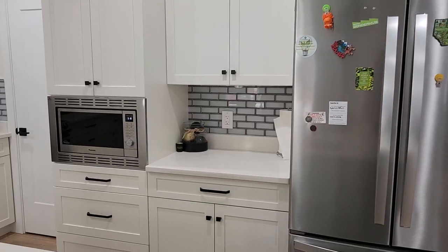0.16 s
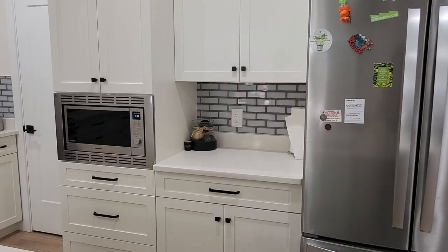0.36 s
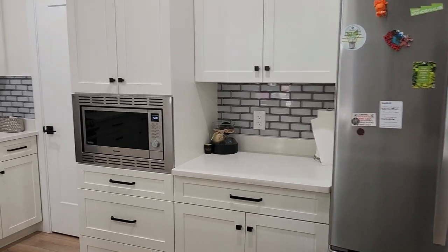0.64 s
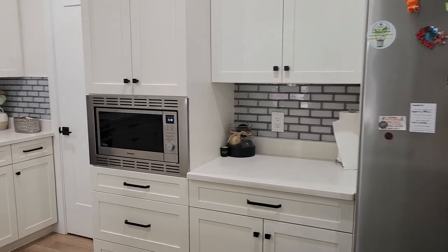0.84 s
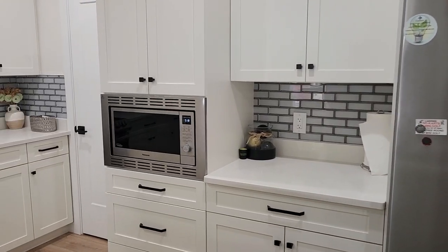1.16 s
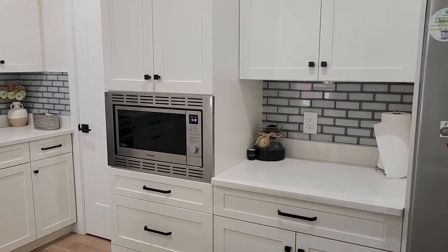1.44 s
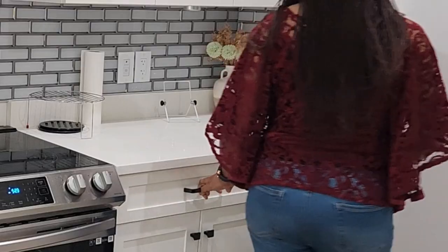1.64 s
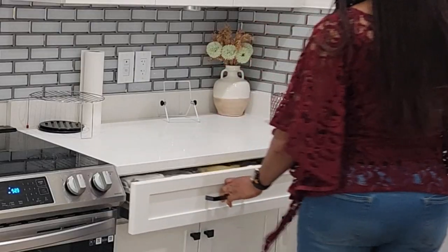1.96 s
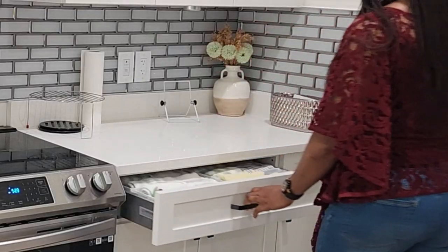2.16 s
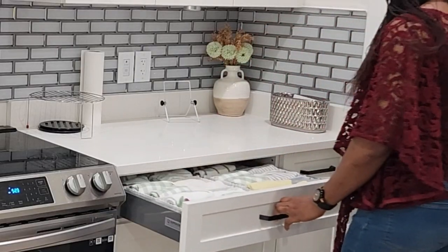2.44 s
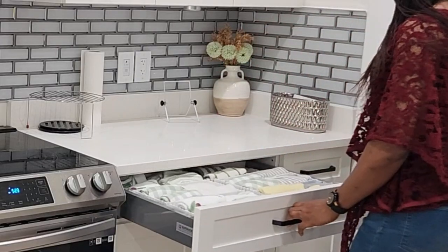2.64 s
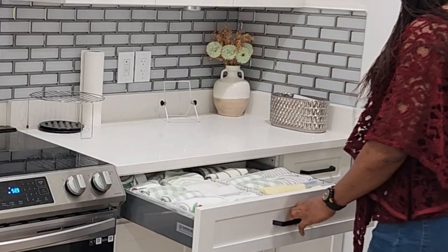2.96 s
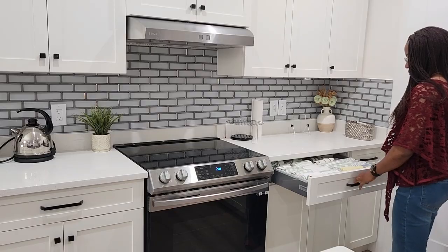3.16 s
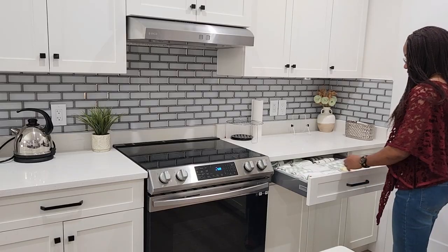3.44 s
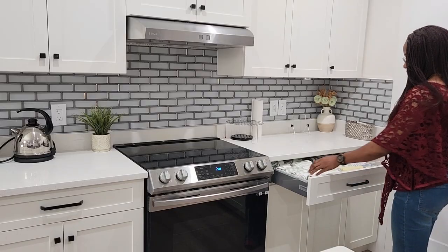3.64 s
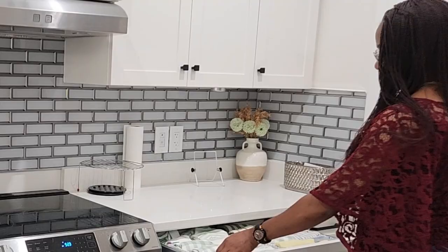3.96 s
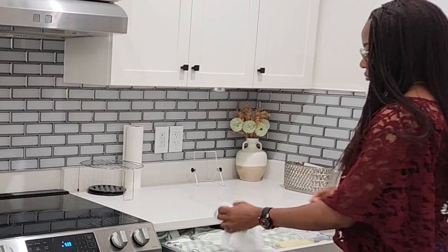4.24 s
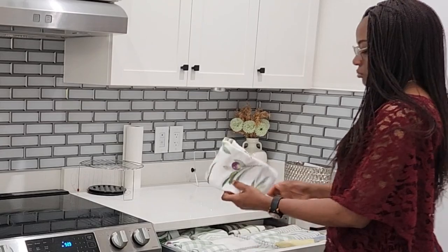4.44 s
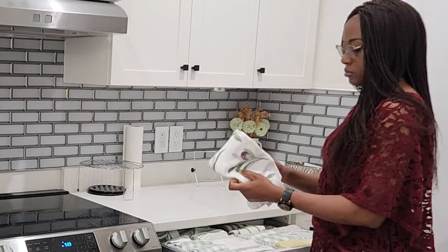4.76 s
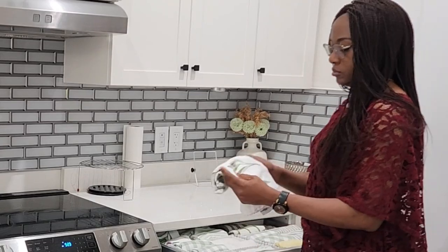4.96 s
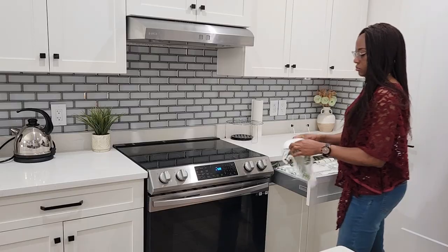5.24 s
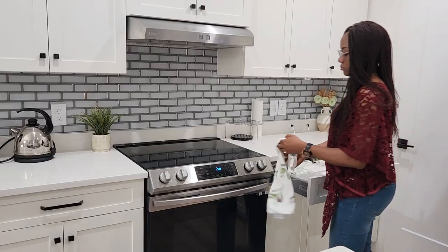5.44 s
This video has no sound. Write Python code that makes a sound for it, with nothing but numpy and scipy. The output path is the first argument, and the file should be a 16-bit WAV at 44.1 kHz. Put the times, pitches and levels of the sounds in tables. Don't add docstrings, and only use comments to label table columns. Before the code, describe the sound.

A quiet, hard-walled kitchen heard from a few steps away in stereo. A low, wavering fridge hum runs while a door seal rubs and the door shuts with a heavy, boxy thud and a tiny spring squeak. An abrupt cut removes the hum; a drawer rolls out on metal runners and knocks its stop. A small object bumps inside, then a towel rustles faintly.

```python
import sys
import numpy as np
from scipy import signal
from scipy.fft import rfft, irfft, next_fast_len
from scipy.io import wavfile
from scipy.ndimage import uniform_filter1d, map_coordinates

SR = 44100
rng = np.random.default_rng(int(sys.argv[2]) if len(sys.argv) > 2 else 0)


def gain_from_db(level_db):
    decades = np.asarray(level_db, float) / 20
    return 10 ** decades


def to_wav(sig):
    pcm = np.clip(np.atleast_2d(sig), -1, 1) * 32767
    pcm = np.round(pcm).astype(np.int16)
    wavfile.write(sys.argv[1], SR, pcm.T)


N = 247070
CHANGE_S = 1.592
LEAD = 512

# (frequency [Hz], level [dB per Hz])
BOX_COLOUR = [(35, -45), (60, -9), (119, -6), (156, -8), (242, -8.5), (287, 3), (331, -5.5), (382, -1.5),
              (714, -2), (962, -12), (1800, -28.5), (2340, -67), (3960, -120)]
# (frequency [Hz], width [Hz], level [dB])
RUNNER_RINGS = [(1600, 450, 3.5), (2224, 100, 11.5), (2630, 980, 0.5), (3850, 440, 2), (4940, 900, 1)]
# (time [s], frequency [Hz])
RUNNER_PITCH = [(1.6, 2820), (1.85, 2950), (1.95, 2200), (2.3, 1900), (2.78, 1600)]
# (time [s], level [dB])
ROLL_LEVEL = [
    (1.6, -50),
    (1.7, -62),
    (1.78, -51.5),
    (1.89, -52.5),
    (1.925, -46.5),
    (2.17, -38.5),
    (2.45, -41),
    (2.72, -48.5),
    (2.778, -49),
]
# (peak time [s], rise [s], ring [dB], hiss [dB])
RUNNER_JOLTS = [
    (1.6, .01, -67, -74),
    (1.78, 0.033, -50, -65),
    (1.926, .02, -64, -63),
]
# (frequency [Hz], width [Hz], level [dB])
HOLLOW_RINGS = [(291, 22, 5), (373, 26, 0), (492, 35, -1.5), (600, 50, -8), (696, 40, 1), (770, 40, -2),
                (900, 76, -12)]
# (frequency [Hz], level [dB per Hz])
RUNNER_HISS = [(4000, -24), (6000, 4.5), (11000, -6), (15500, -1.0)]
# (time [s], peak [dB], brightness [dB per octave], panel ring [dB])
STOP_BLOWS = [
    (2.773, -24, 1.5, -5),
    (2.78, -17, -.5, 0),
    (2.79, -17, 1, -1.5),
    (2.798, -16, -0.5, -2),
    (2.812, -18, 0, 2),
    (2.829, -19, -3, 3.5),
    (2.854, -25, -0.5, 1),
    (2.936, -34.5, -0.5, 0),
]
# (frequency [Hz], level [dB per Hz])
DRAWER_COLOUR = [(15, -31), (25, -2.5), (53, 1), (80, -8.5), (105, -4.5), (173, -9.5), (225, -7.5),
                 (270, -16), (400, -5), (520, -14), (684, -12), (1140, -25), (12200, -44.5), (15500, -46)]
# (frequency [Hz], level [dB], decay t60 [s])
DRAWER_MODES = [(48.1, -11, 0.75), (123.7, 1, 0.19), (226.8, -8.5, 0.34), (355, -7, .2), (420, 1, 0.2),
                (463, -10, 0.22), (645, -2.5, 0.19), (765, -11, 0.27), (970, -16, .25), (1670, -26, .25),
                (2040, -21, .25), (3020, -31, .2), (5400, -30, .15)]
# (time [s], peak [dB], brightness [dB per octave], panel ring [dB])
DROP_BLOWS = [
    (3.489, -33.5, 2, -2),
    (3.495, -28, 0.5, -3),
    (3.51, -36, 1.5, 3),
    (3.524, -27.5, -1, 0),
    (3.548, -33, 0, 0),
    (3.578, -31.5, -5, 1.5),
]
# (frequency [Hz], level [dB per Hz])
BASE_COLOUR = [(15, -43), (28, -16), (50, -2), (120, -5), (198, -5.5), (313, -24.5), (360, -7.5),
               (523, -17), (684, -9.5), (945, -18), (1380, -12.5), (2500, -15), (3440, -17.5), (7000, -31),
               (10000, -47), (15500, -62)]
# (frequency [Hz], level [dB], decay t60 [s])
BASE_MODES = [(29.85, -10, .8), (190, -8, .15), (692, -5, .12), (1390, -9, .1), (1800, -14, .1),
              (2500, -12, .08), (365, -6, .15)]

# (frequency [Hz], level [dB per Hz])
SEAL_COLOUR = [(530, -36), (900, -1), (1010, -20), (1090, 1), (1210, -6.5), (1930, -3), (2410, -7),
               (6000, -23), (7800, -51), (13200, -120)]
# (frequency [Hz], level [dB per Hz])
PANEL_COLOUR = [(59, -31), (100, 2), (152, 4), (205, -12.5), (403, -4.5), (491, -21), (580, -16),
                (1030, -38), (1200, -31), (1560, -58), (2640, -120)]
# (frequency [Hz], level [dB per Hz])
SQUEEZED_AIR = [(2500, -28.0), (4000, 0.5), (5500, 1.5), (8000, -7.5), (11000, -15.5), (15500, -10.5)]
# (peak time [s], rise [s], rub [dB], squeezed air [dB])
SEAL_GRIPS = [
    (.5, .04, -54.5, -63),
    (.592, 0.017, -46.5, -58),
    (.645, 0.089, -53, -54.5),
    (.76, 0.11, -48, -65),
    (.845, .1, -75, -55),
]
# (time [s], frequency [Hz], level [dB], length [s], unsteadiness [dB])
SPRING_SQUEAKS = [
    (0.655, 6940, -62, .03, 1),
    (0.89, 6900, -59.5, .06, 1),
    (.95, 2195, -63, .06, 4),
]
# (time [s], peak [dB], brightness [dB per octave], panel ring [dB])
DOOR_BLOWS = [(.696, -25, -1, 1), (.734, -24, -2, -5), (.761, -20, 0, 3), (.783, -15, 2, -8),
              (.791, -17, -1, -1), (.806, -11.5, 0, 1.5), (.822, -14.5, 0.5, 1.5), (.834, -17, 0.5, 0),
              (.844, -18, 0, -2), (.877, -22, -2.5, 1), (.933, -30, 1, 0)]
# (frequency [Hz], level [dB per Hz])
DOOR_COLOUR = [(18, -48), (35, -21), (58, 2.5), (80, -18), (102, 5), (130, -3), (156, -14), (200, -1.5),
               (270, -13.5), (365, -14), (450, -23.5), (620, -20), (1140, -28.5), (15500, -77.5)]
# (frequency [Hz], level [dB], decay t60 [s])
DOOR_MODES = [(62, -6, 0.45), (105.2, 6.5, 0.16), (126.3, -2.5, 0.2), (187.3, 0.5, 0.17), (288, -13, 0.16),
              (336, -7, 0.18), (385.7, 0, 0.16), (595, -8, 0.11), (748, -14, 0.12), (1017, -21, .15)]

# (frequency [Hz], level [dB per Hz])
WEAVE_COLOUR = [(290, -66.5), (500, -5), (1270, 0), (1700, -2.5), (2230, -6), (3580, -9), (8480, -10),
                (13000, -20), (15500, -28)]
# (peak time [s], rise [s], level [dB])
TOWEL_FOLDS = [
    (4.29, 0.073, -65),
    (4.6, 0.12, -57),
    (4.67, 0.13, -59),
    (4.93, .04, -64),
    (4.975, .06, -63.5),
    (5.1, .15, -66.5),
    (5.6, 0.054, -65),
]

# (time [s], level [dB], centre [Hz], width [octaves])
DRY_TICKS = [(.586, -53, 2800, 0.78), (.587, -59, 5200, 0.28), (.587, -61.5, 8950, .5),
             (.604, -51.5, 2200, 0.82), (.761, -32.5, 396, 0.35), (.782, -32, 800, .9),
             (.783, -48.5, 2670, 0.6), (.795, -46, 2200, .7), (.723, -39.5, 590, 0.47),
             (2.239, -46, 686, 0.67), (.63, -60, 5500, 0.42), (2.79, -42.5, 5440, 0.35),
             (3.5, -47, 1390, .4), (1.593, -54, 2780, 2.3), (1.788, -66, 8080, 1.2), (2.668, -43, 290, 1.2),
             (3.491, -46, 1500, .8), (3.495, -42, 2560, 0.82), (3.499, -39, 2600, .6),
             (3.528, -45.5, 2200, 1), (2.449, -47.5, 382, .6), (2.473, -48, 299, .6),
             (2.626, -50.5, 659, 0.51), (2.813, -42, 3200, 1.6), (3.522, -41, 664, 0.8)]
# (time [s], level [dB], centre [Hz], width [octaves])
ROOM_TAPS = [(.479, -61, 3720, .67), (.622, -47, 1480, 1.5), (.697, -43, 404, 2.1), (1.771, -53, 9000, 1.7),
             (1.887, -48, 2200, 0.87), (1.918, -46, 770, 0.45), (2.03, -47, 710, .8),
             (2.118, -41.5, 600, 1.16), (2.715, -59.5, 1600, .26), (3.09, -60, 2200, 1.2),
             (3.2, -65, 1700, 1.3), (3.252, -60.5, 10130, 1.5)]
# (middle [s], half length [s], frequency [Hz], level [dB])
SINGING_RUBS = [(1.755, .045, 4600, -59), (1.8, 0.073, 4750, -58.5), (1.73, 0.045, 3000, -64),
                (1.6, .056, 3800, -64), (1.79, .07, 2690, -54.5), (1.81, .028, 1510, -54.5),
                (1.927, 0.037, 2140, -57), (1.25, 0.093, 124.5, -47.5), (2.715, 0.014, 1400, -71),
                (.52, 0.025, 830, -53.5), (3.933, 0.025, 430, -55), (.605, .02, 208, -45.5),
                (1.98, .025, 206, -49.5), (5.2, .14, 1450, -72.5), (5.8, 0.087, 3700, -75),
                (4.969, 0.047, 1240, -63.5), (2.2, .12, 2180, -63), (1.9, .025, 1700, -59),
                (2.7, 0.045, 2300, -66), (4.96, .03, 2400, -70), (5.06, .02, 3600, -71),
                (5.19, .012, 5000, -70), (5.245, .02, 1450, -70), (1.2, .1, 255, -54.5),
                (5.353, 0.018, 1500, -66)]
# (middle [s], half length [s], frequency [Hz], level [dB])
BROAD_RUBS = [(1.64, 0.054, 880, -56), (1.9, 0.021, 170, -53), (2.68, 0.12, 88, -43),
              (2.5, 0.024, 130, -46), (3.4, .09, 9100, -67.5), (3.139, .1, 504, -55.5),
              (3.795, .024, 950, -60), (0.634, 0.038, 10000, -61), (0.73, 0.036, 10000, -64),
              (2.01, .15, 1120, -53), (2.35, .17, 1220, -59), (5.9, .012, 540, -61),
              (4.96, 0.043, 4700, -66), (4.285, .03, 910, -58), (4.29, 0.036, 12500, -67),
              (3.8, .03, 185, -58), (5.369, 0.017, 450, -60)]

# (frequency [Hz], level [dB rms])
COMPRESSOR_TONES = [(59.2, -45), (183.0, -64), (296.1, -69), (360.7, -54.5), (484.5, -67), (543.7, -60.5),
                    (651.4, -59)]
# (time [s], level [dB])
FRIDGE_LEVEL = [(0, -41.5), (.45, -42.5), (1.1, -42.5), (1.3, -42.5), (1.59, -40.5)]
# (frequency [Hz], level [dB per Hz])
MOTOR_COLOUR = [(15, -46), (25, -12.5), (59, 0), (119, -16), (289, -18.5), (400, -17), (650, -18),
                (1450, -38), (2060, -42), (4000, -51), (5400, -47.5), (7500, -56.5), (15500, -62.5)]
# (frequency [Hz], level [dB per Hz])
AIR_COLOUR = [(88, -42), (150, -5), (234, -0.5), (359, -11.5), (388, -4.5), (462, -8.5), (519, -9),
              (1240, -15), (1510, -15.5), (2450, -17.5), (15500, -33)]
# (frequency [Hz], level [dB per Hz])
HOUSE_COLOUR = [(15, -22), (28, 4.5), (50, 3), (85, 5.5), (130, -2.5), (165, -13.5), (230, -45)]
# (peak time [s], rise [s], level [dB])
FLOOR_SHAKES = [
    (1.62, .03, -48),
    (1.88, .08, -43.5),
    (2.91, .15, -44),
    (3.3, 0.24, -52.5),
    (3.55, .1, -64),
    (3.97, .2, -54),
]
# (frequency [Hz], decay t60 [s])
KITCHEN_DECAY = [(30, 1.35), (100, 0.57), (300, 0.56), (1000, 0.54), (3000, 0.55), (8000, 0.44),
                 (15000, 0.2)]
# (frequency [Hz], side minus mid [dB])
STEREO_WIDTH = [(30, -23), (90, -23), (180, -18), (350, -13.5), (700, -5), (1400, -1.2), (5000, 0),
                (15000, .5)]
# (frequency [Hz], left minus right [dB])
PORT_COLOUR = [(60, .2), (300, .6), (700, .5), (3000, 1.4), (8000, .5), (11000, -.5), (13000, -2),
               (15500, -2)]


def drawer():
    rumble_db, = curves(ROLL_LEVEL)
    out_s = np.arange(N) / SR - CHANGE_S
    moving = (out_s > 0) * (rumble_db > -90)
    ring_jolt, hiss_jolt = swells(RUNNER_JOLTS, fall_db_per_s=120)
    ring_gain = moving * np.hypot(gain_from_db(-56.5 - 9 * out_s), ring_jolt)
    hiss_gain = moving * np.hypot(gain_from_db(-69 - 3.5 * out_s), hiss_jolt)

    rumble = gain_from_db(rumble_db - 2.5) * (rush(BOX_COLOUR, lumpy_db=1.6, rate=64) + gain_from_db(-2.5) * balls())
    hiss = hiss_gain * rush(RUNNER_HISS)
    roll = rumble + ring_gain * runner_ring() + hiss

    stop = knock(STOP_BLOWS, DRAWER_COLOUR, DRAWER_MODES, level_db=-10, ring_db=-16.5, shorter=0.73)
    stop = filtered(stop, lambda hz: gain_from_db(-5 * (hz / 13000) ** 2 * [[.5], [-.5]]))
    drop = knock(DROP_BLOWS, BASE_COLOUR, BASE_MODES, level_db=-10.0, ring_db=-15, shorter=0.73)
    return roll + stop + drop


def balls(bumps_per_s=800, scatter_db=10, soft_hz=1000):
    chance, strength = rng.random((2, N))
    bumps = (chance < bumps_per_s / SR) * gain_from_db(scatter_db * strength) * rng.choice([-1, 1], N)
    late = np.convolve(bumps, rng.standard_normal(600) * gain_from_db(-np.arange(600) / 30))[:N]
    pair = np.array([bumps + late / 8, late / 10])
    mid, side = filtered(pair, lambda f: resonant(HOLLOW_RINGS)(f) / (1 + 1j * f / soft_hz) ** 3)
    return np.array([mid + side, mid - side]) / np.sqrt(np.mean(mid ** 2))


def runner_ring():
    def steel(hz):
        return abs(resonant(RUNNER_RINGS)(hz))

    def favour(hz, t):
        pitch_hz = np.interp(t, *np.transpose(RUNNER_PITCH))
        return np.exp(-np.log2(hz / pitch_hz) ** 2 / 8.5) + 0.2

    ring = swept(favour) * gain_from_db(1.4 * wobble(130))
    power = np.mean(filtered(ring, steel) ** 2, 0)
    ring /= np.sqrt(abs(uniform_filter1d(power, size=4000)))
    return spread(ring, steel)


def door():
    t = np.arange(N) / SR
    swing_s, shut_s = 0.54, .78
    rub, squeeze = swells(SEAL_GRIPS, fall_db_per_s=114)
    rumble = gain_from_db(-24.5 - 117 * abs(shut_s - t)) * (t > swing_s)
    drag = (rub * rush(SEAL_COLOUR) + rumble * rush(PANEL_COLOUR)) * (t < shut_s)
    drag += squeeze * rush(SQUEEZED_AIR)

    spring = np.zeros(N)
    for s, hz, db, length, shaky_db in SPRING_SQUEAKS:
        swell = np.exp(-((t - s) / length) ** 2 * 2)
        spring += gain_from_db(db + shaky_db * wobble(59.6)) * swell * np.sin(2 * np.pi * hz * t)

    thud = knock(DOOR_BLOWS, DOOR_COLOUR, DOOR_MODES, level_db=-13.0, ring_db=-10.0, shorter=0.88, axis=-1)
    return drag + spring + thud * (t < CHANGE_S)


def knock(blows, colour, modes, level_db, ring_db, shorter, axis=1):
    out, t = np.zeros((2, N)), np.arange(SR) / SR
    onset = 1 - np.exp(-t / 0.0019)
    for s, db, bright, panel_db in blows:
        gain = lambda hz: gain_from_db(along(colour, hz) + bright * np.log2((hz + 20) / 300))
        add(out, s - LEAD / SR, gain_from_db(db + level_db) * answer(gain, shorter, click=0.55))
        for hz, mode_db, t60 in modes:
            decay = gain_from_db(mode_db + rng.normal(0, 2.4) - 60 * t / t60)
            ring = decay * np.sin(2 * np.pi * hz * t) * onset
            strength = gain_from_db(db + ring_db + panel_db + bright * np.log2(hz / 300))
            add(out, s, axis * strength * ring[None])
    return out


def towel():
    def fold_hz(t):
        return np.exp(np.interp(t, (4.52, 4.67), np.log([730, 2780])))

    def fold_gain(hz, t):
        top = fold_hz(t)
        peak = 1 / (1 + (np.log2(hz / top) / 0.31) ** 2)
        return (peak + 0.4 * (hz < top)) / np.sqrt(top)

    pull, = swells([(4.565, 0.075, -53.5)], fall_db_per_s=170, hold=0.11)
    song = pull * gain_from_db(1.2 * wobble(40)) * spread(swept(fold_gain), band(1530, 2.8))
    in_hands = np.arange(N) / SR > 4.15
    rustle = np.hypot(swells(TOWEL_FOLDS, fall_db_per_s=100)[0], gain_from_db(-71.5) * in_hands)
    return song + rustle * rush(WEAVE_COLOUR, lumpy_db=1.2, rate=90)


def ticks():
    out = np.zeros((2, N))
    for rows, shorter, click in (DRY_TICKS, .22, 3), (ROOM_TAPS, 0.82, 2.4):
        for s, db, hz, octaves in rows:
            add(out, s - LEAD / SR, gain_from_db(db) * answer(band(hz, octaves), shorter, click, rise=.002))
    return out


def rubs():
    out = np.zeros((2, N))
    for rows, octaves in (SINGING_RUBS, 0.22), (BROAD_RUBS, 1.28):
        for s, half, hz, db in rows:
            t = np.arange(-3 * half, 3 * half, 1 / SR)
            sound = spread(rng.standard_normal((2, t.size)), band(hz, octaves))
            same_scene = (s + t > CHANGE_S) == (s > CHANGE_S)
            add(out, s + t[0], gain_from_db(db) * np.exp(-(t / half) ** 2) * same_scene * sound)
    return out


def background():
    t = np.arange(N) / SR
    level_db, = curves(FRIDGE_LEVEL)
    tones = np.zeros(N)
    for hz, db in COMPRESSOR_TONES:
        level = gain_from_db(db + 1.5 + 1.5 * wobble(11.4))
        tones += level * np.sin(2 * np.pi * hz * t + 0.65 * wobble(9.87))
    fridge = gain_from_db(level_db - 3) * rush(MOTOR_COLOUR) + tones

    rolling_db = 1.5 * (t < 3.2)
    house = np.hypot(gain_from_db(-55 + rolling_db), swells(FLOOR_SHAKES, fall_db_per_s=106)[0])
    air = gain_from_db(-62.5 + rolling_db) * rush(AIR_COLOUR)
    return np.where(t < CHANGE_S, fridge, air + house * rush(HOUSE_COLOUR, lumpy_db=0.5, rate=12))


def answer(gain, shorter, click, rise=0.003):
    n = int(SR * min(.15 + shorter, .8))
    hz, t, z = signal.stft(rng.standard_normal((2, n)), SR, nperseg=512)
    decay = gain_from_db(-60 * t / (shorter * along(KITCHEN_DECAY, hz)[:, None]))
    tail = signal.istft(z * decay, SR, nperseg=512)[1][:, :n]
    tail = tail * np.minimum(np.arange(n) / SR / rise, 1)
    tail[:, :90] += click * rng.standard_normal(90) * gain_from_db(-np.arange(90) / 3)
    fade_in = np.minimum(np.arange(n + LEAD) / LEAD, 1) ** 2
    sound = spread(np.pad(tail, ((0, 0), (LEAD, 0))), gain) * fade_in
    return sound / np.sqrt(np.mean(sound[:, LEAD:LEAD + SR // 25] ** 2))


def rush(spectrum, lumpy_db=0, rate=60):
    flicker = gain_from_db(lumpy_db * wobble(rate))
    return spread(rng.standard_normal((2, N)) * flicker, lambda hz: gain_from_db(along(spectrum, hz)))


def swept(gain):
    hz, t, z = signal.stft(rng.standard_normal((2, N)), SR, nperseg=256)
    return signal.istft(z * gain(hz[:, None] + 1, t), SR, nperseg=256)[1][:, :N]


def spread(pair, gain):
    def colour(hz):
        return gain(hz) * modal(hz) * gain_from_db([0 * hz, along(STEREO_WIDTH, hz)])

    mid, side = filtered(pair, colour)
    return np.array([mid + side, mid - side]) / np.sqrt(np.mean(mid ** 2) + 1e-20)


def modal(hz, spacing_hz=25, depth=0.52):
    knots = rng.standard_normal((2, 2, 2000))
    parts = [[np.interp(hz / spacing_hz, np.arange(k.size), k) for k in pair] for pair in knots]
    share = depth * np.minimum(hz / 500, 1)
    return 1 - share + share * np.hypot(*parts)


def resonant(peaks):
    def response(f):
        total = 0
        for k, (centre, width, db) in enumerate(peaks):
            damping = 1j * f * width
            total = total + gain_from_db(db) * damping / (centre * centre - f * f + damping) * (-1) ** k
        return total
    return response


def band(hz, octaves):
    return lambda f: np.exp(-2 * (np.log2((f + 1) / hz) / octaves) ** 2)


def filtered(x, response):
    n = x.shape[-1]
    m = next_fast_len(n + 4096)
    return irfft(rfft(x, m) * response(np.fft.rfftfreq(m, 1 / SR)), m)[..., :n]


def along(points, hz):
    f, v = np.transpose(points)
    return np.interp(np.log(hz + 1), np.log(f + 1), v)


def curves(rows):
    s, *cols = np.transpose(rows)
    times = [s[0] - .015, *s, s[-1] + .015]
    return [np.interp(np.arange(N) / SR, times, [-110, *c, -110]) for c in cols]


def swells(rows, fall_db_per_s, hold=0):
    t, (s, rise, *cols) = np.arange(N) / SR, np.transpose(rows)[:, :, None]
    falling_db = -fall_db_per_s * np.maximum(t - s - hold, 0)
    shape = gain_from_db(np.where(t < s, 20 * (t - s) / rise, falling_db))
    return [np.sqrt(np.sum((gain_from_db(c) * shape) ** 2, axis=0)) for c in cols]


def wobble(rate):
    knots = rng.standard_normal(int(N * rate / SR) + 4)
    return map_coordinates(knots, [np.arange(N) * rate / SR])


def add(out, s, sound):
    part = out[:, round(s * SR):][:, :sound.shape[1]]
    part += sound[:, :part.shape[1]]


def scene():
    return drawer() + door() + towel() + ticks() + rubs() + background()


def top_cut(x):
    return signal.sosfilt(signal.butter(12, 16130, fs=SR, output="sos"), x)


def record(dry):
    mix = filtered(dry, lambda hz: gain_from_db(along(PORT_COLOUR, hz) * [[.5], [-.5]]) * (hz < 15760))
    return top_cut(mix)


dry = scene()
out = record(dry)
to_wav(out)
```